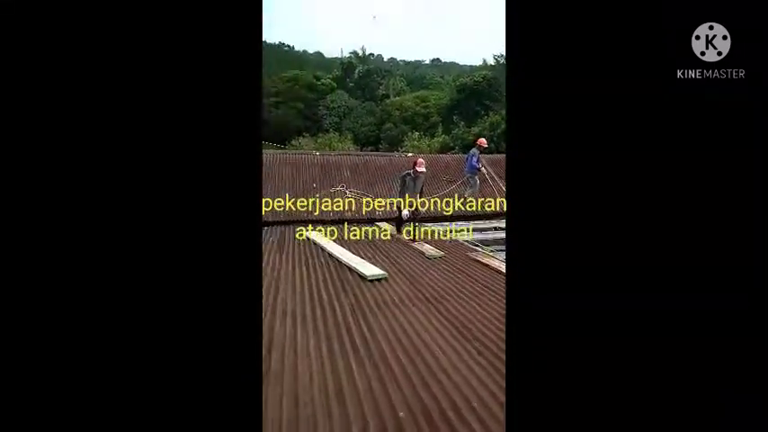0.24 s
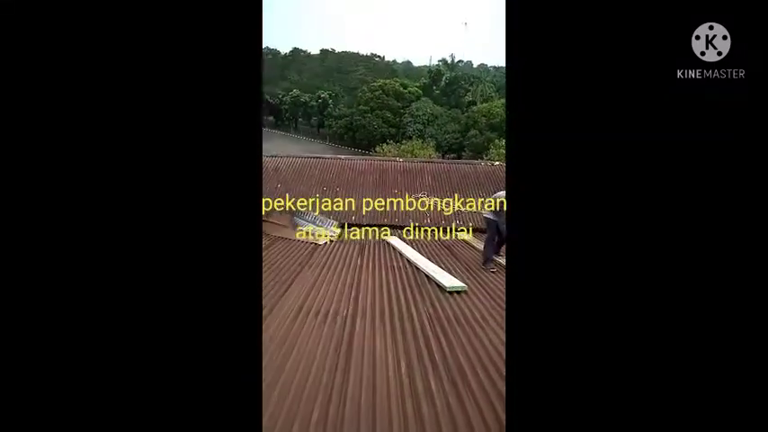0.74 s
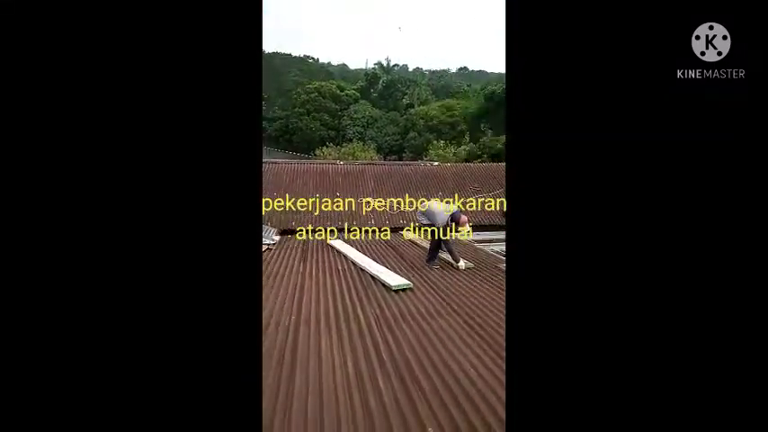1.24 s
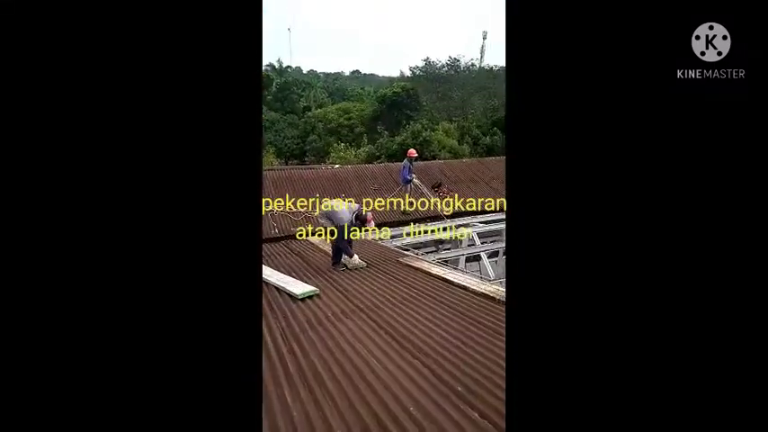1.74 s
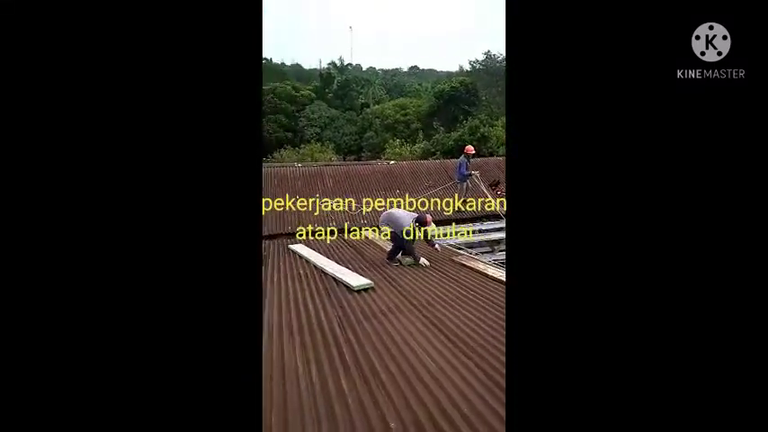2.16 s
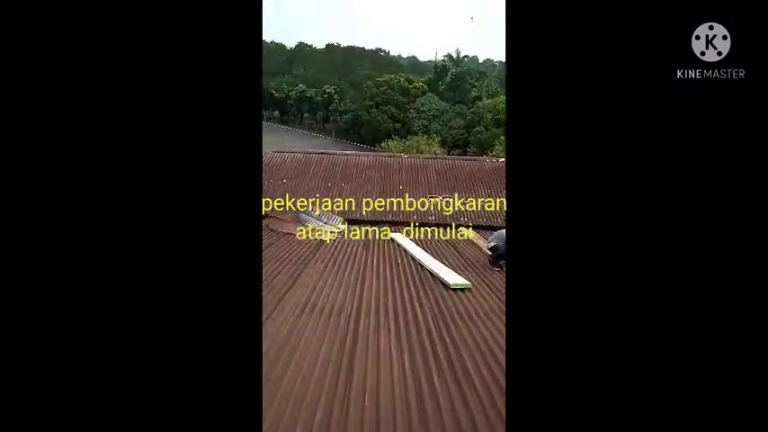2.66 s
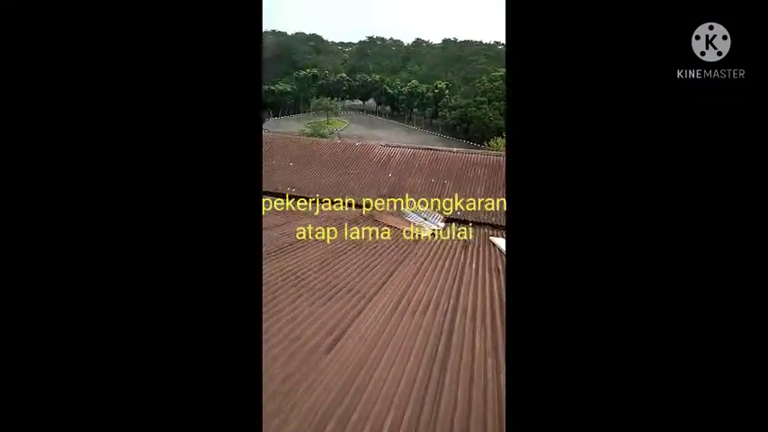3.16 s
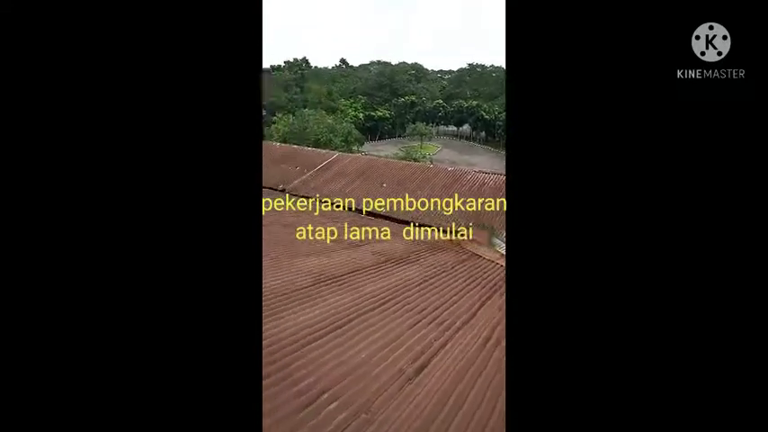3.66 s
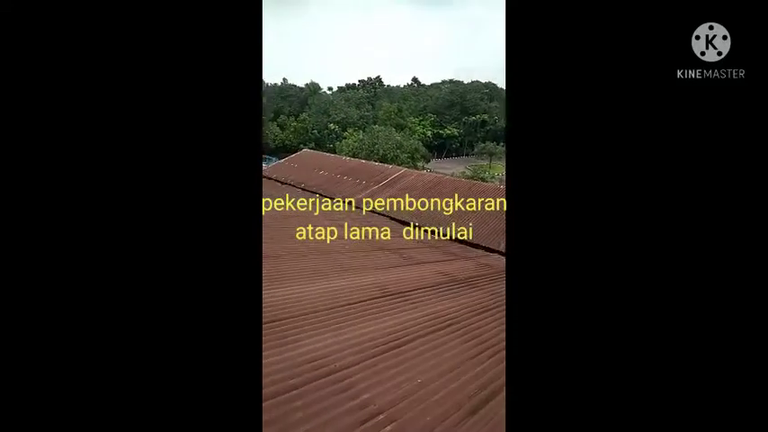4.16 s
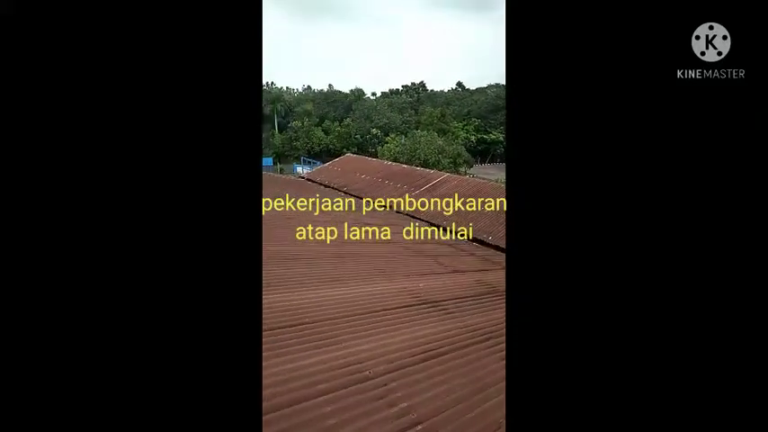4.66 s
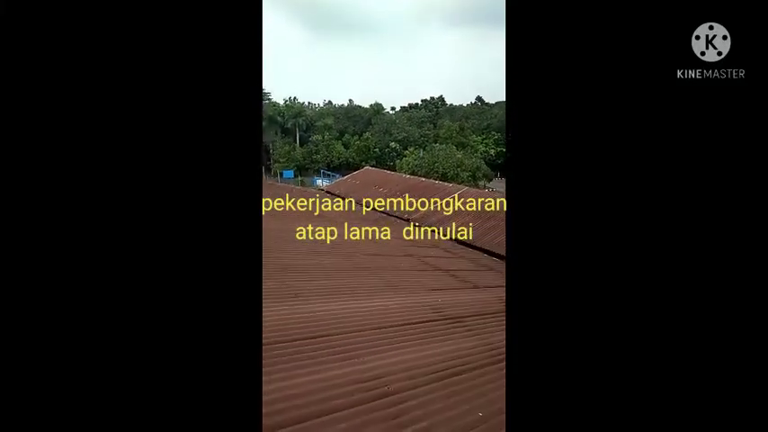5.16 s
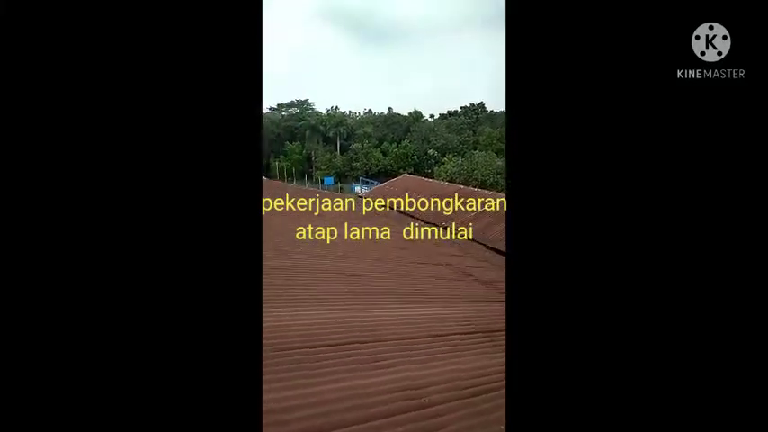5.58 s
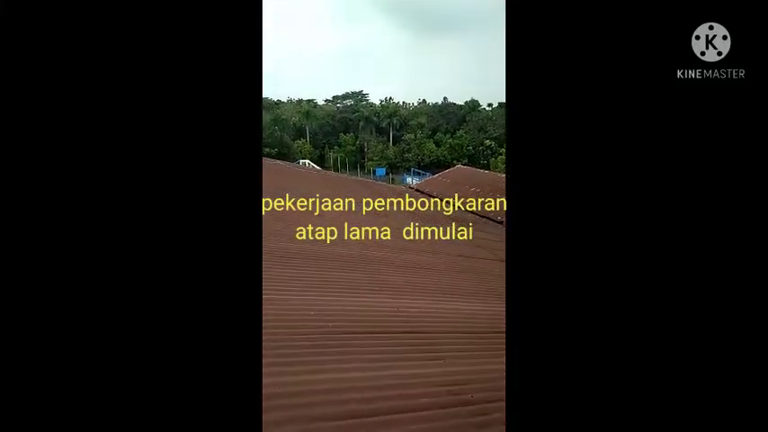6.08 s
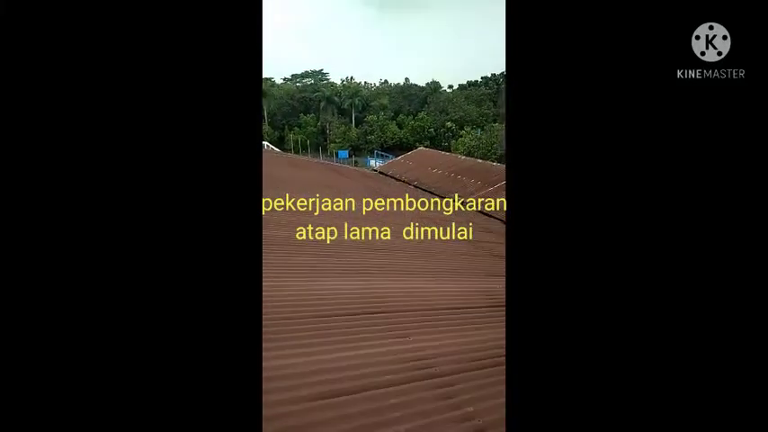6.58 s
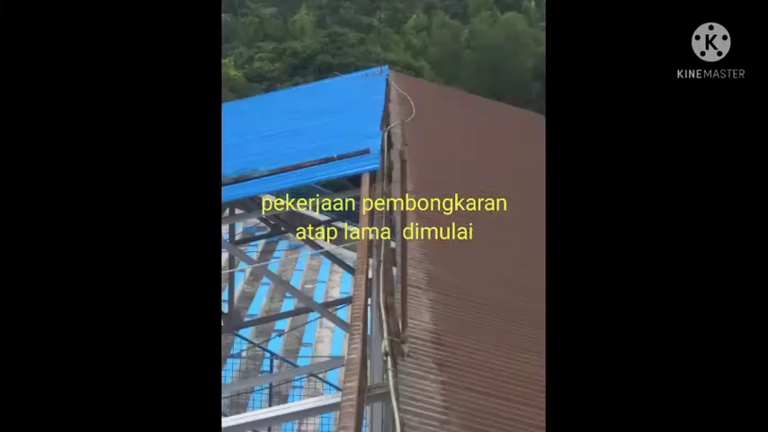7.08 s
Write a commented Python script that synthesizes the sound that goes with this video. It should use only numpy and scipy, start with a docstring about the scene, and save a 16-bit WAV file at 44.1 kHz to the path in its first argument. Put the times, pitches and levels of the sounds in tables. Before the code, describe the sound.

On an open-air corrugated metal roof, quiet scrapes and small knocks lead to one hollow bang with tinny rattle. After a lull, heavier steps boom in quick clusters, with rust sizzling and a low frame rumble. The loudest bangs come near the end. Close to the metal, the sound is strongly left, faint and dull on the right.

```python
"""Heavy steps on an old corrugated metal roof, heard from the roof itself in the open air, with knocks.
Each blow snaps a sheet through (a damped swing), rings its modes and makes it chatter (coloured clicks).
Battens and loose metal knock (clicks through resonances); rusty laps scrape and sizzle (swelling clicks).
The roof frame rumbles underneath (coloured noise that sways and dips under footfalls).
The sound sits far to the left; the right side is faint, dull and slightly late."""
import sys
import numpy as np
from scipy import signal
from scipy.fft import rfft, irfft
from scipy.io import wavfile

SR = 44100
rng = np.random.default_rng(int(sys.argv[2]) if len(sys.argv) > 2 else 0)


def wav_out(sig):
    """Save sig, one row per channel (or a flat mono array), as 16-bit PCM at SR to the path in sys.argv[1]."""
    wavfile.write(sys.argv[1], SR, np.round(np.clip(np.atleast_2d(sig).T, -1, 1) * 32767).astype(np.int16))


N = 322812
T = np.arange(N) / SR  # time [s]
NEXT_SHEET_S = 3.4  # the walker moves on to a duller sheet


def undb(db):
    """Level to amplitude: 20 dB is a factor of ten."""
    return 10 ** (np.asarray(db) / 20)


def unit(x):
    """Normalise the mean power: scale to rms 1."""
    return x / np.sqrt(np.mean(x ** 2) + 1e-18)


def response(points, size=4096):
    """Minimum phase: a folded cepstrum gives the causal impulse response of a (Hz, dB) colour."""
    hz, db = np.transpose(points)
    grid = np.maximum(np.arange(size // 2 + 1) * SR / size, 1)
    level_db = np.interp(np.log(grid), np.log(hz), db)
    cepstrum = irfft(np.log(undb(level_db)))
    cepstrum[1:size // 2] *= 2
    cepstrum[size // 2 + 1:] = 0
    return irfft(np.exp(rfft(cepstrum)))


def colour(x, points):
    """Linear filtering of a white excitation by a unit-energy response, which keeps its power."""
    h = response(points)
    return signal.oaconvolve(x, h / np.linalg.norm(h))[:len(x)]


def underfoot(x, first, second):
    """Excitation and resonator: x takes the colour of whichever sheet the walker is on."""
    on_first = colour(x * (T < NEXT_SHEET_S), first)
    on_second = colour(x * (T >= NEXT_SHEET_S), second)
    return on_first + on_second


def walk(rate, size):
    """Slow random modulation: straight lines between random knots, rate per second, spread near 1."""
    knots = rng.standard_normal(4096)
    return 1.2 * np.interp(np.arange(size) * rate / SR, np.arange(len(knots)), knots)


def contacts(per_s, spread_db, size):
    """Random impact process: tiny metal-to-metal clicks of uneven strength, rms 1."""
    hit = rng.random(size) < per_s / SR
    strength_db = spread_db * np.minimum(rng.exponential(size=size), 4)
    return unit(hit * rng.standard_normal(size) * undb(strength_db))


def add(track, s, x):
    """Superposition: mix x into the track from time s."""
    start = max(int(s * SR), 0)
    track[start:start + len(x)] += x[:N - start]


def ribs(x, t60, wet_db):
    """Scattering between ribs and edges: a short dense ring makes every click tinny."""
    t = T[:SR // 4]
    h = rng.standard_normal(len(t)) * undb(-60 * t / t60)
    h *= undb(wet_db) / np.linalg.norm(h)  # scattered energy relative to the direct click
    h[0] += 1
    return signal.oaconvolve(x, h / np.linalg.norm(h))[:N]


def effort(s, build_s, hold_s, t60):
    """Envelope of muscular force: a pull or heave from time s builds up, tires in the hold, dies away."""
    swell_db, tire_db_per_s = 25.5, 9.5
    t = T - s
    building = swell_db * np.minimum(t / build_s - 1, 0)
    tiring = tire_db_per_s * np.clip(t - build_s, 0, hold_s)
    released = 60 * np.maximum(t - build_s - hold_s, 0) / t60
    return (t >= 0) * undb(building - tiring - released)


def resonance(x, hz, q):
    """Modal crowding: two equal resonators in series make a steep band, rms 1."""
    b, a = signal.iirpeak(hz, q, fs=SR)
    once = signal.lfilter(b, a, x)
    return unit(signal.lfilter(b, a, once))


def knocks():
    """Forced resonance: battens and loose metal rattle briefly in their own hollow resonances."""
    # knocks and clinks, three resonances each: (time [s], t60 [s], sharpness Q of each resonator,
    # frequency [Hz], level [dB], frequency [Hz], level [dB], frequency [Hz], level [dB])
    knock_table = [(0.0, 0.34, 3.4, 402, -50, 485, -51, 794, -91),
                   (0.165, 0.11, 9.5, 2300, -60, 2550, -67, 3100, -75),
                   (0.563, 0.28, 2.5, 484, -67.5, 920, -67, 2450, -69),
                   (1.004, 0.57, 3.6, 500, -50, 604, -60.5, 910, -61),
                   (1.41, 0.46, 7.1, 1410, -51, 2640, -44.5, 3000, -58),
                   (1.423, 0.76, 2.6, 277, -47, 860, -58, 1025, -43.5),
                   (0.719, 0.98, 4.5, 3220, -65, 5630, -62, 8650, -57),
                   (1.64, 0.66, 4.4, 306, -29, 694, -31, 985, -34.5),
                   (1.985, 1.1, 6.1, 295, -57.5, 1170, -66.5, 1750, -67),
                   (2.179, 0.47, 8.5, 1128, -77, 3157, -63, 6530, -68),
                   (2.199, 2, 13, 1190, -80, 3430, -78.5, 9260, -78),
                   (2.774, 0.32, 2.26, 335, -38.5, 843, -43.5, 1030, -47),
                   (2.781, 0.29, 3, 1460, -72, 2740, -54.5, 6430, -66),
                   (3.136, 0.32, 6.4, 1535, -76, 2420, -71, 2620, -87),
                   (3.929, 0.27, 15, 2334, -40, 4000, -68, 8120, -30),
                   (3.99, 0.67, 11, 2500, -53, 3660, -49, 5360, -53),
                   (5.174, 0.28, 2.3, 778, -59, 1040, -73.5, 2640, -74)]
    out, t = np.zeros(N), T[:SR]
    for s, t60, q, *bands in knock_table:
        rattle = contacts(6000, 0, len(t))
        body = np.zeros(len(t))
        for hz, db in zip(bands[::2], bands[1::2]):
            body += undb(db) * resonance(rattle, hz, q)
        onset = 1 - np.exp(-t / 0.0019)
        add(out, s, body * undb(-60 * t / t60) * onset)
    return out


def scrapes():
    """Stick-slip friction: rust grains catch in the laps and the sheet rasps; one pull drives both."""
    # one sheet dragged over another: (time [s], build-up [s], hold [s], release t60 [s],
    # hiss of rust [dB], rasp of the metal [dB])
    slides = [(0, 0.011, 0.017, .3, -77, -74.5), (0.154, 0.062, 0.019, 1, -53.5, -54.5),
              (0.715, 0.01, 0.032, 0.19, -41.5, -61), (0.754, .19, 0.16, 0.47, -59, -63.5),
              (1.26, 0.17, 0.15, 0.25, -57.5, -60), (1.627, 0.02, 0.1, 0.36, -46, -38.5),
              (2.165, 0.024, 0.011, 0.22, -55, -60.5), (2.3, 0.094, 0.42, .9, -87.5, -82),
              (3.17, 0.042, .01, 0.59, -71, -95), (3.295, 0.079, 0.019, 0.28, -62.5, -88),
              (3.496, 0.096, 0.35, 0.34, -55.5, -66.5), (3.929, 0.014, .11, 0.4, -37.5, -41.5),
              (4.136, 0.093, .1, 0.47, -52.5, -58.5), (4.42, 0.12, 0.035, 0.39, -59.5, -43),
              (4.524, 0.079, 0.18, 0.19, -51, -57), (5.1, 0.26, .08, .3, -75.5, -94),
              (5.439, 0.045, 0.13, 0.22, -52, -69.5), (5.766, 0.14, 0.062, .5, -60.5, -69),
              (6.1, .2, 0.18, 0.83, -54.5, -65), (6.517, 0.23, 0.088, 0.23, -38, -41)]
    # dry rust powder sliding in a lap, first and next sheet: (frequency [Hz], density [dB per Hz])
    first_hiss = [(2000, -45.5), (4600, -28.5), (5800, -15.5), (7500, -11), (9000, 0), (10300, 2.5),
                  (12000, -2.5), (13300, -8), (15000, -7)]
    next_hiss = [(2000, -31), (5000, -21.5), (7000, -14.5), (8300, -8.5), (9600, -5), (10700, -0.5),
                 (11900, -7.5), (13200, -12), (15500, -22)]
    # metallic rasp; the first sheet sings near 3 kHz: (frequency [Hz], density [dB per Hz])
    first_rasp = [(150, -22.5), (450, 1), (1000, -17.5), (1900, -9), (2500, -0.5), (3150, 2), (3800, -6),
                  (4700, -17), (5600, -6.5), (7500, -9), (9200, -5.5), (10500, -13), (15000, -17.5)]
    next_rasp = [(150, -12), (500, 5), (800, -5), (1150, 2), (1700, -5), (2400, 2.5), (2800, -4),
                 (3400, -5), (4600, -10.5), (5600, -6.5), (9000, -26.5)]
    creep_hiss_db, creep_rasp_db = -87.5, -88  # the laps never lie quite still
    hiss_gain, rasp_gain = undb(creep_hiss_db), undb(creep_rasp_db)
    for s, build_s, hold_s, t60, hiss_db, rasp_db in slides:
        pull = effort(s, build_s, hold_s, t60)
        hiss_gain = np.hypot(hiss_gain, undb(hiss_db) * pull)  # powers add
        rasp_gain = np.hypot(rasp_gain, undb(rasp_db) * pull)
    grip_db = walk(60, N)
    hiss = underfoot(contacts(11000, 2.7, N), first_hiss, next_hiss)
    hiss = ribs(hiss, t60=0.014, wet_db=2.0)
    rasp = underfoot(contacts(5000, 1.4, N), first_rasp, next_rasp)
    rasp = ribs(rasp, t60=0.12, wet_db=-5.5)
    return (hiss * hiss_gain + rasp * rasp_gain) * undb(grip_db)


def frame():
    """Low-frequency structural vibration: the frame rumbles in slow lumps and gives under footfalls."""
    # the walker's weight sets the frame swaying:
    # (time [s], build-up [s], hold [s], release t60 [s], level [dB])
    heaves = [(0.682, .16, .1, 0.65, -63), (1.63, .08, .35, 2, -57.5), (3.551, .08, 0.53, .5, -42.5),
              (4.26, 0.15, 0.36, 0.68, -36), (4.897, 0.18, .7, 1.5, -63.5), (5.98, .06, .12, 1.04, -27),
              (6.649, 0.12, 0.084, 0.22, -51.5)]
    # soft footfalls that only flex the roof: (time [s], level [dB])
    footfalls = [(0.378, -52), (.598, -58.5), (0.879, -63), (1.174, -56), (2.21, -74), (2.395, -55.5),
                 (3.241, -71), (3.405, -73), (4.87, -62), (6.409, -37), (6.487, -44), (6.561, -42.5)]
    # colour of the rumble: (frequency [Hz], density [dB per Hz])
    frame_colour = [(12, -22.5), (25, -2.5), (38, 3.5), (80, 1.5), (130, -1), (210, -6.5), (300, -9.5),
                    (500, -15), (1000, -23.5), (3000, -50)]
    rest_db = -66.5  # rumble between heaves
    sole_settle_s = 0.0067  # a footfall's load peaks after this time
    sway = undb(rest_db)
    for s, build_s, hold_s, t60, db in heaves:
        sway = np.hypot(sway, undb(db) * effort(s, build_s, hold_s, t60))
    load = sway * undb(2.7 * walk(22, N))
    t = T[:SR // 4] / sole_settle_s
    for s, db in footfalls:
        add(load, s, undb(db) * t * np.exp(1 - t))
    return colour(rng.standard_normal(N), frame_colour) * load


def ring(t, t60, detune):
    """Modal superposition: each blow lands elsewhere and weights the sheet's strong modes anew."""
    # ringing of a sheet: (frequency [Hz], level [dB], longest t60 [s])
    sheet_modes = [(212, -1, .8), (449, -2, .45), (480, 1, .85), (715, -7, .7), (788, -3, .75),
                   (844, -7, .7), (990, -7, .9), (1060, -6, .8), (1278, -8, .6), (1426, -9, .7),
                   (1857, -13, .8), (1918, -13, .7), (2160, -13, .55), (2238, -13, .5), (2330, -12, .6),
                   (2456, -13, .6), (2519, -12, .6), (2567, -12, .55)]
    hz, db, own_t60 = np.transpose(sheet_modes)[:, :, None]
    level_chance, pitch_chance, sign_chance = rng.standard_normal((len(hz), 3)).T[:, :, None]
    gain = undb(db + 2 * level_chance)
    waves = np.sin(2 * np.pi * hz * (1 + detune * pitch_chance) * t) * np.sign(sign_chance)
    decay = undb(-60 * t / np.minimum(own_t60, 0.82 * t60))
    return np.sum(gain * waves * decay, axis=0) / np.sqrt(np.sum(gain ** 2) / 2)


def buckle(t, hz, cycles):
    """Snap-through instability: the sheet gives one heavily damped swing."""
    return -np.sin(2 * np.pi * hz * t) * np.exp(-t * hz / cycles)


def blows():
    """Impact excitation: each blow snaps a sheet through, booms and leaves it chattering on its laps."""
    # blows on the sheets close by: (time [s], deep flex [dB], boom [dB], clang [dB],
    # rust sizzle [dB], nominal ring t60 [s])
    blow_table = [(0.173, -62.5, -66, -82, -63, 1), (0.275, -49.5, -46.5, -51.5, -44.5, 0.21),
                  (0.717, -91, -81, -80, -44.5, 0.22), (1.266, -73, -68, -72, -57, 0.15),
                  (1.485, -45.5, -65, -51.5, -76, 0.33), (1.639, -19.5, -24, -27, -37.5, 0.61),
                  (2.062, -47.5, -56, -73, -74, 0.19), (2.178, -58, -67, -67.5, -67.5, 0.79),
                  (3.579, -26.5, -26, -32, -38.5, 0.84), (3.699, -43, -33.5, -35.5, -44, 0.66),
                  (3.928, -69, -43, -68, -29, 0.58), (4.217, -57, -86, -60, -35.5, 0.16),
                  (4.274, -56, -47, -49, -64, 0.17), (4.302, -21, -20.5, -26.5, -31, 0.49),
                  (4.422, -25.5, -23, -29, -33.5, 0.44), (4.535, -40.5, -35, -38, -26.5, 0.21),
                  (4.61, -48, -34, -45, -62, 0.55), (4.683, -33, -34.5, -61.5, -68, 0.45),
                  (5.464, -35.5, -37, -47.5, -50, 0.37), (5.989, -53, -50.5, -50.5, -64, 0.27),
                  (6.011, -18.5, -14, -19.5, -32.5, 0.74), (6.048, -32, -26, -21, -32.5, 0.59),
                  (6.118, -25.5, -24.5, -29.5, -32.5, 0.6), (6.627, -53.5, -49.5, -53, -52.5, 0.76),
                  (6.836, -30, -29, -33.5, -49.5, 0.32), (6.896, -31, -32, -41, -63.5, 0.17)]
    # colours of the flexing and the booming sheet: (frequency [Hz], density [dB per Hz])
    flex_colour = [(20, -14), (45, -9), (65, -0.5), (110, -0.5), (150, -0.5), (220, 0.5), (300, -2),
                   (450, -14), (1000, -50)]
    boom_colour = [(80, -21.5), (200, -13), (320, -5.5), (500, -1), (640, -8), (800, -15), (1100, -18.5),
                   (2000, -52)]
    # clang of the brighter first sheet and of the next: (frequency [Hz], density [dB per Hz])
    first_clang = [(400, -27.5), (750, 2), (1050, 0.5), (1400, -1), (1900, -3.5), (2400, -6.5),
                   (3100, -4.5), (3700, -18.5), (4700, -25.5), (5500, -14.5), (6300, -24.5), (9000, -33)]
    next_clang = [(400, -26.5), (750, 0), (1050, 1.5), (1400, -4.5), (1700, -6.5), (2100, -5.5),
                  (2500, -5.5), (2800, -13.5), (3200, -12), (3900, -22.5), (5500, -21.5), (9000, -26.5)]
    # sizzle of shaken rust: (frequency [Hz], density [dB per Hz])
    sizzle_colour = [(1200, -47.5), (3200, -8.5), (4600, -18), (5600, -17.5), (6500, -14), (8200, 0.5),
                     (9400, 2.5), (10500, 3.5), (11500, 2.5), (12800, -14.5), (15500, -20.5)]
    thump_db = 11  # snap-through relative to the flex: deeper blows snap harder
    tones_db = -9.5  # strong modes relative to the boom
    flex, boom, clang, sizzle, tones = np.zeros((5, N))
    t = T[:SR]
    snap = 1 + 0.27 * np.exp(-t / 0.00072)  # first contact is the hardest
    crack = 1 + 1.1 * np.exp(-t / 0.0012)  # rust cracks off at the first contact
    loose = 1 - np.exp(-t / 0.014)  # after the first push the sheet slaps in uneven bursts
    for s, flex_db, boom_db, clang_db, sizzle_db, t60 in blow_table:
        decay = undb(-60 * t / t60) * (1 - np.exp(-t / 0.0006))
        chatter_db = 1.5 * loose * walk(95, len(t))
        flex_gain = undb(flex_db + 3.2 * loose * walk(40, len(t))) * decay ** 1.115
        boom_gain = undb(boom_db + 0.32 * chatter_db) * decay
        clang_gain = undb(clang_db + chatter_db) * snap * decay ** 0.99
        sizzle_gain = undb(sizzle_db + 0.6 * chatter_db) * crack * decay ** 1.126
        add(flex, s, flex_gain * contacts(9000, 0, len(t)))
        add(boom, s, boom_gain * contacts(9000, 0, len(t)))
        add(clang, s, clang_gain * contacts(7000, 1.8, len(t)))
        add(sizzle, s, sizzle_gain * contacts(12000, 1.3, len(t)))
        add(tones, s, undb(boom_db + tones_db) * ring(t, t60, detune=0.00052))
        thump_hz = 440 * np.exp(0.12 * rng.standard_normal())
        add(tones, s, undb(flex_db + thump_db) * buckle(t, thump_hz, cycles=0.34))
    clang = ribs(underfoot(clang, first_clang, next_clang), t60=0.0098, wet_db=-6.5)
    sizzle = ribs(colour(sizzle, sizzle_colour), t60=0.021, wet_db=4.5)
    return colour(flex, flex_colour) + colour(boom, boom_colour) + clang + sizzle + tones


def scene():
    """Interaural level and time difference: the roof on the left, a late, muffled share on the right."""
    # the right side relative to the left: (frequency [Hz], level [dB])
    right_colour = [(40, -6.5), (110, -14), (210, -12.5), (330, -21.5), (700, -22), (1290, -26),
                    (2380, -36), (4000, -45.5), (12000, -53.5)]
    left_db, right_lag_s = 5, 0.00038
    left = undb(left_db) * (knocks() + scrapes() + frame() + blows())
    right = signal.oaconvolve(left, response(right_colour))[:N]
    return np.array([left, np.interp(T - right_lag_s, T, right)])


def record(dry):
    """Saturation and band limiting: peaks are rounded, the sound stops before the end, the top is cut."""
    end_s, top_hz = 7.0, 15550
    running = np.clip((end_s - T) / 0.01 + 1, 0, 1)  # fades over 10 ms from end_s
    rounded = dry / (1 + (dry / 0.9) ** 4) ** (1 / 4)
    low_pass = signal.ellip(10, 0.2, 70, top_hz, fs=SR, output="sos")
    return signal.sosfilt(low_pass, rounded * running)


dry = scene()
out = record(dry)
wav_out(out)
```